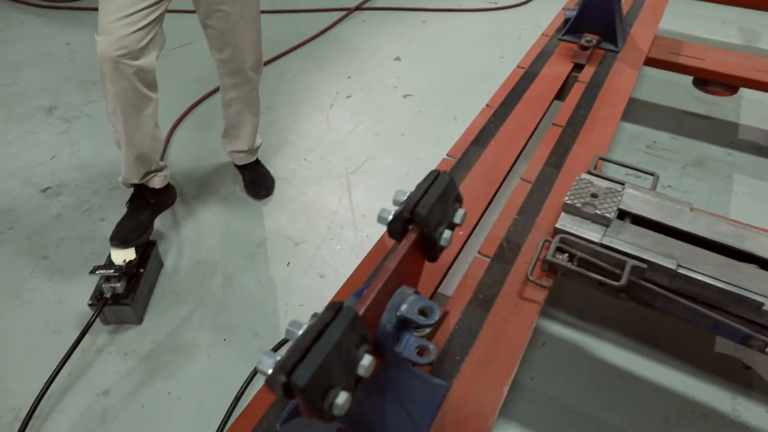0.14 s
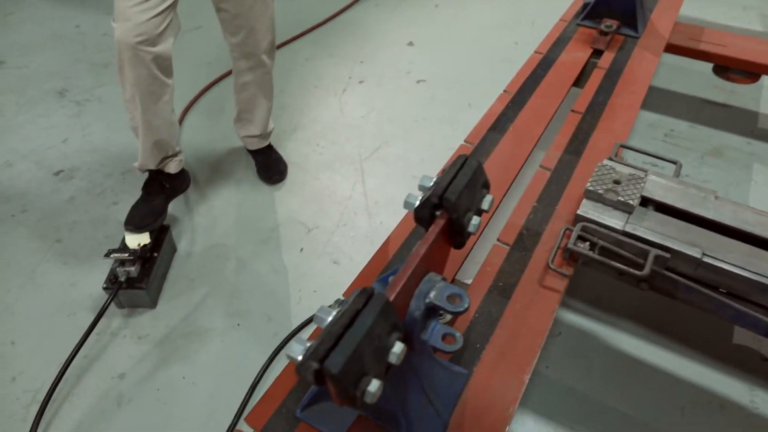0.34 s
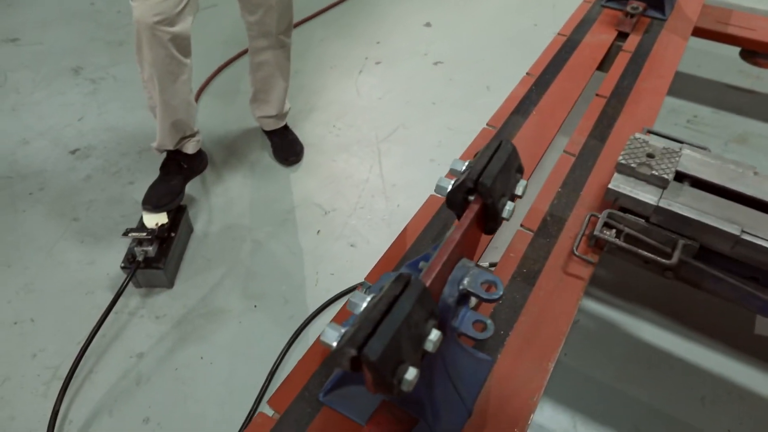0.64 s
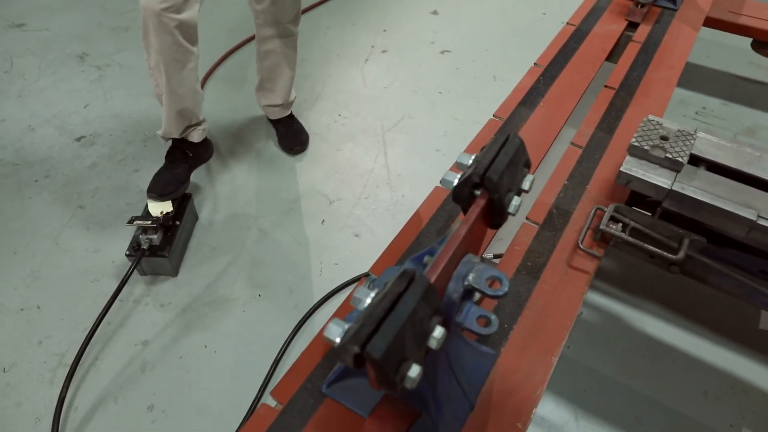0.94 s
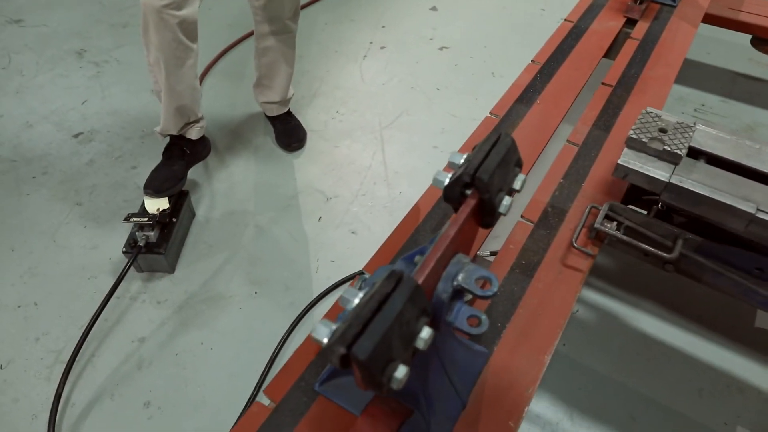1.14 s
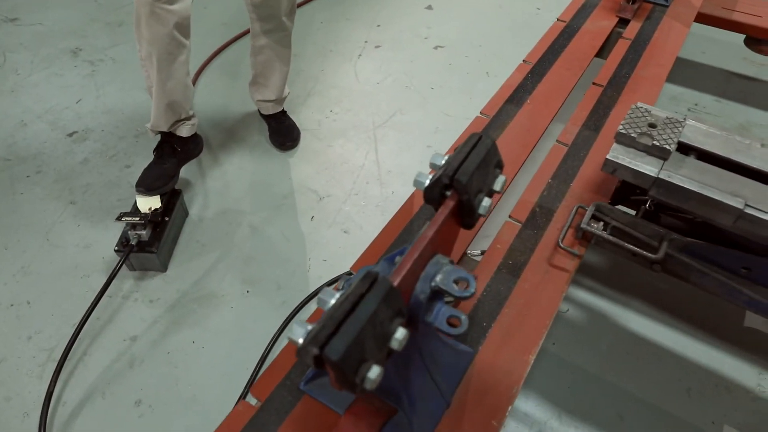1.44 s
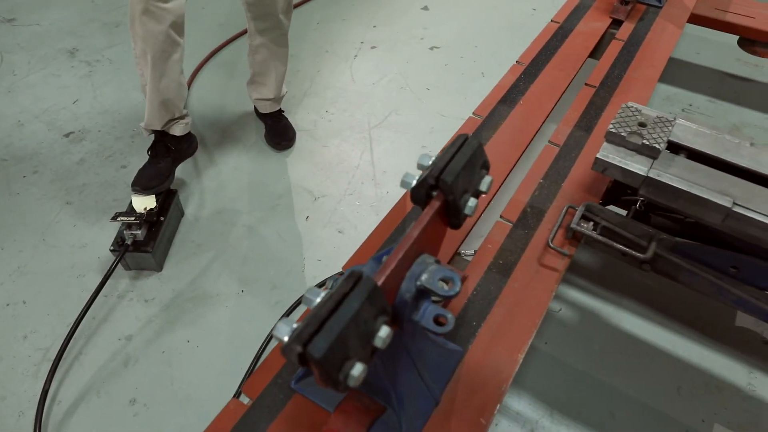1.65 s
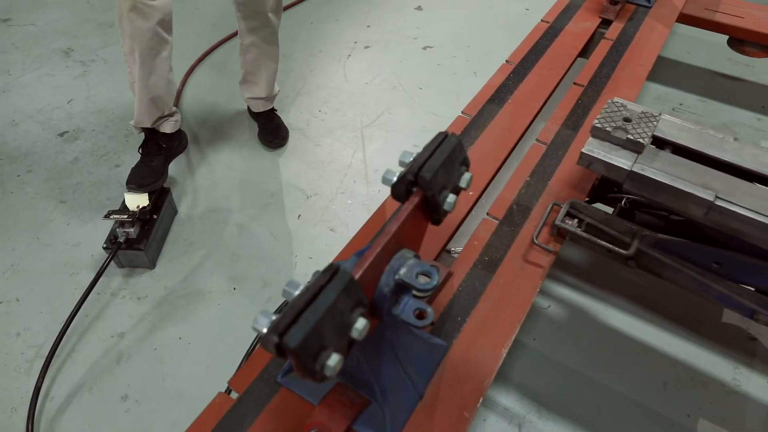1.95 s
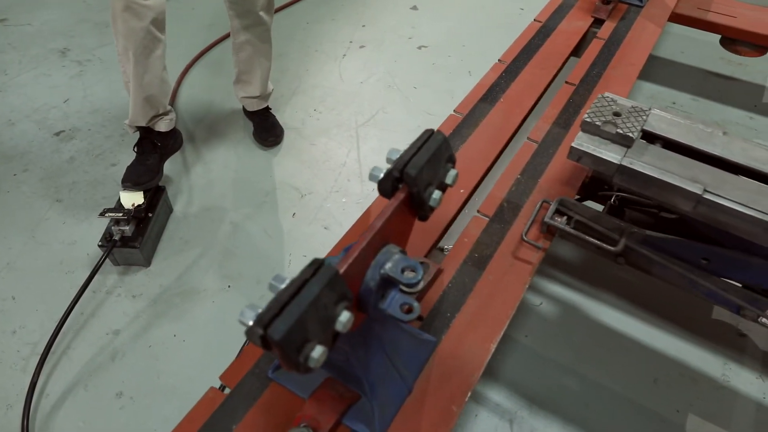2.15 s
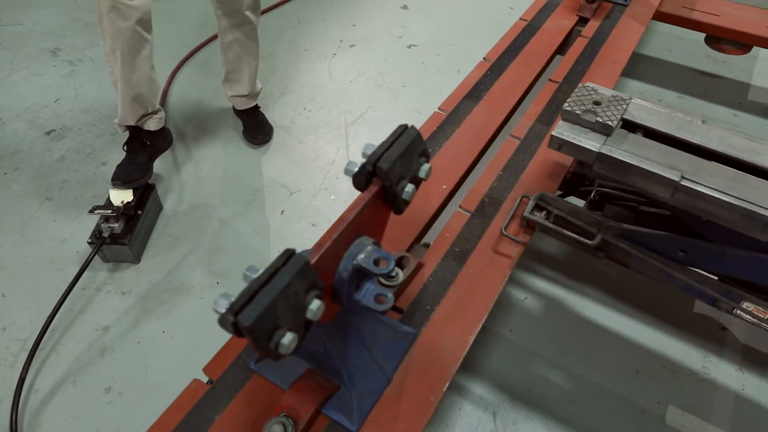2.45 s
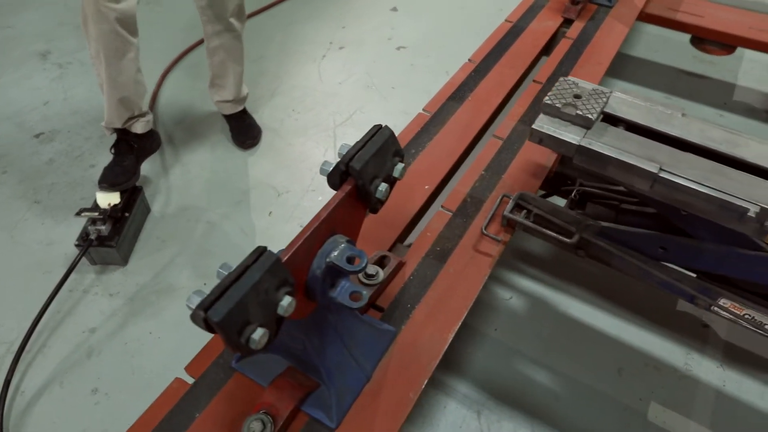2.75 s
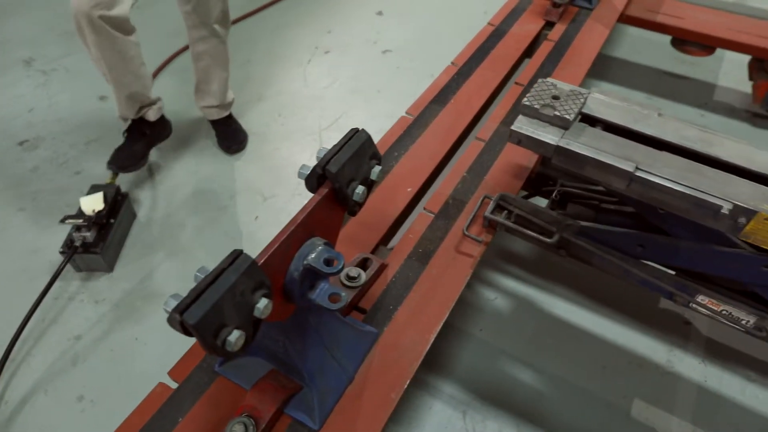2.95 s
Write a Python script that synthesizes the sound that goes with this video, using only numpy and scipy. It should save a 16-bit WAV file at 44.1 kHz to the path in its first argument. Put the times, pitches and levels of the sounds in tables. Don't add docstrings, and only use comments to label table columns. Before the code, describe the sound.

After a sharp pedal click, an air-powered pump chatters fast and hisses loudly, drops to separate heavy puffs, then hammers again and stops; close microphones, echoing hall, loudest blows slightly clipped.

```python
import sys
import numpy as np
from scipy import signal
from scipy.fft import rfft, irfft
from scipy.io import wavfile
from scipy.ndimage import uniform_filter1d

SR = 44100
rng = np.random.default_rng(int(sys.argv[2]) if len(sys.argv) > 2 else 0)


def rack_gain(trim_db):
    fader = np.asarray(trim_db, float)
    return 10 ** (fader / 20)


def persist_wave(psi):
    counts = np.round(np.clip(psi, -1, 1) * 32767).astype(np.int16)
    wavfile.write(sys.argv[1], SR, np.atleast_2d(counts).T)


N = 136710
T = np.arange(N) / SR


def evened(x):
    return x / np.sqrt(np.mean(x ** 2) + 1e-20)


def read(points, hz):
    f, value = np.transpose(points)
    return np.interp(np.log(hz + 1), np.log(f + 1), value)


def curve(points):
    s, db = np.transpose(points)
    return rack_gain(np.interp(T, s, db))


def struck(rows, shape):
    train = np.zeros(N)
    for s, db in rows:
        train[round(s * SR)] = rack_gain(db)
    return signal.oaconvolve(train, shape)[:N]


def resonate(x, peaks):
    out = 0
    for hz, width, db in peaks:
        r = np.exp(-np.pi * width / SR)
        top = [(1 - r * r) / 2, 0, (r * r - 1) / 2]
        bottom = [1, -2 * r * np.cos(2 * np.pi * hz / SR), r * r]
        out = out + rack_gain(db) * signal.lfilter(top, bottom, x)
    return out


def rung(modes, rise_s):
    t = T[:20000]
    tones = sum(rack_gain(db - 60 * t / t60) * np.sin(2 * np.pi * hz * t) for hz, db, t60 in modes)
    return tones * np.minimum(t / rise_s, 1)


def thump(dip_s, sag, fade_s):
    t = T[:4000]
    swing = -np.sin(np.pi * (t / dip_s) ** sag)
    return swing * np.exp(-(t / fade_s) ** 2 / 2) * np.minimum(t / dip_s, 1)


# (frequency [Hz], likeness [0 to 1])
LIKENESS = [(60, 0.93), (300, 0.8), (1400, 0.99), (3100, 0.96), (7000, 0.9), (15000, 0.99)]
# (frequency [Hz], left minus right [dB])
LEFT_LEAN = [(60, -1), (180, 3), (550, -0.5), (1650, 0), (4970, -1.5), (15000, 2.5)]


def air(spectrum, patchy_db, flicker_db):
    frames, hz = N // 128 + 6, np.fft.rfftfreq(512, 1 / SR)
    a, b, c, d, patches = rng.standard_normal((frames, 257, 5)).T
    patches = uniform_filter1d(patches, size=5, axis=0)
    patches = evened(uniform_filter1d(patches, size=12, axis=1))
    same = np.clip(read(LIKENESS, hz), 0, 1)[:, None]
    lean = read(LEFT_LEAN, hz)[:, None] / 2
    mid = (a + 1j * b) * np.sqrt(1 + same)
    side = (c + 1j * d) * np.sqrt(1 - same)
    z = np.array([(mid + side) * rack_gain(lean), (mid - side) / rack_gain(lean)])
    flicker = flicker_db * rng.standard_normal(frames)
    z = z * rack_gain(read(spectrum, hz)[:, None] + patchy_db * patches + flicker)
    return evened(signal.istft(z, nperseg=512, noverlap=384)[1][:, :N])


# (time [s], level [dB])
FIRST_RUN = [(0.2309, -3), (0.2748, -10), (0.3204, -18), (0.3655, -17), (0.41, -7), (0.4551, -13),
             (0.5008, -10), (0.5437, -5), (0.5866, -4), (0.6305, -4), (0.6754, -7), (0.7183, -5),
             (0.7607, -3), (0.8041, -3), (0.848, -4), (0.8914, -5), (0.9343, -6), (0.9772, -3),
             (1.0206, -7), (1.0635, -5), (1.1064, -4), (1.1493, -4), (1.1922, -5), (1.2351, -3)]
# (time [s], level [dB])
SECOND_RUN = [(2.2093, -4), (2.2537, -10), (2.2961, -6), (2.3375, -3), (2.3794, -5), (2.4218, -4),
              (2.4642, -5), (2.5066, -5), (2.5485, -5), (2.5904, -6), (2.6328, -6), (2.6747, -7),
              (2.7171, -6), (2.759, -5)]
# (frequency [Hz], width [Hz], level [dB])
CYLINDER = [(1700, 300, -9), (2200, 300, -7), (5700, 400, -9), (6900, 300, -9), (8100, 300, -8),
            (8850, 400, -9), (13300, 700, -5), (15000, 800, -8)]


def blows():
    rows, t = list(FIRST_RUN) + list(SECOND_RUN), T[:3000]
    rattle_s = .001
    hit = t / rattle_s * np.exp(-t / rattle_s) + 1.2 * np.exp(-t / .004)
    grit = rng.standard_normal(N) + 0.57 * rng.standard_normal((2, N))
    ring = resonate(struck(rows, hit) * grit, CYLINDER)
    even = [(s, 0.17 * db) for s, db in rows]
    swell = np.minimum(t / .004, 1) ** 2
    chuff = struck(even, swell * np.exp(-t / .012)) * air(JET, patchy_db=2.0, flicker_db=-3.5)
    return rack_gain(4) * ring + rack_gain(-11) * chuff + body(rows) + heads(rows)


# (delay [s], level [dB])
BOUNCES = [
    (.0035, -16),
    (.0115, -10),
]


def head(modes, tune):
    t, out = T[:1200], 0
    lag_s = .0005
    for hz, db, delay, top in modes:
        u = np.maximum(t - delay - lag_s, 0) / top
        out = out + rack_gain(db) * u * np.exp(1 - u) * np.sin(2 * np.pi * hz * tune * t)
    echoes = sum(rack_gain(db) * np.roll(out, round(s * SR)) for s, db in BOUNCES)
    return rack_gain(1) * (out + echoes)


# (frequency [Hz], level [dB], delay [s], time to peak [s])
HEAD = [(4980, 0, 0, .0007), (5250, -9, .0002, .0008), (4500, -12, 0, .0006), (8800, -7, .0008, .0008),
        (9700, -12, .0004, .0006), (2200, -19, .0015, .001)]
# (frequency [Hz], level [dB], delay [s], time to peak [s])
CHIRP = [(5350, 0, .002, .001), (5750, -1, .004, .0012), (6700, -6, 0, .0006)]


def heads(rows):
    out = np.zeros(N)
    for (s, db), chance in zip(rows, rng.standard_normal((len(rows), 1))):
        tune = 1 + .015 * chance
        chirp_db = -9 if s >= SECOND_RUN[0][0] else -18
        ring = head(HEAD, tune) + rack_gain(chirp_db) * head(CHIRP, tune)
        out[round(s * SR):][:len(ring)] += rack_gain(db) * ring
    return out


# (frequency [Hz], level [dB], time to fade 60 dB [s])
BODY = [(150, -16, .085), (300, -21, .03), (47, -24, .25), (420, -23, .03), (105, -26, .1)]
# (frequency [Hz], level [dB], time to fade 60 dB [s])
RETURN = [(258, -25, .2), (330, -30, .08)]
# (time [s], level [dB])
SEATING = [(.23, 3), (.27, -5), (.6, -6), (.75, -4), (1.0, -2.5), (1.3, -.5), (2.2, 0), (2.8, 0)]


def body(rows):
    s = np.transpose(rows)[0]
    landing = struck(zip(s + .0012, 0 * s), rung(BODY, rise_s=0.00069))
    returning = struck(zip(s + .025, 0 * s), rung(RETURN, rise_s=0.00033))
    return curve(SEATING) * (landing + returning)


# (time [s], level [dB])
FLOW = [(.17, -53), (.2295, -23), (.2315, -13.5), (.4, -13), (.8, -13), (1.24, -13.5), (1.27, -17),
        (1.4, -29.5), (1.85, -56.5), (1.9, -26), (2.15, -23), (2.22, -14.5), (2.35, -12), (2.77, -12.5),
        (2.79, -15.5), (2.9, -33)]
# (frequency [Hz], level [dB])
JET = [(210, 0), (350, -1.5), (726, -11.5), (1110, -5), (2580, -4), (2980, -6), (4500, -3.5), (7840, -7),
       (15500, -3)]
# (frequency [Hz], width [Hz], level [dB])
MUFFLER = [(1102, 52, 10), (1905, 320, -14.5), (4240, 450, 1), (4300, 7300, -6), (11400, 2100, -1)]
# (frequency [Hz], width [Hz], level [dB])
WHISTLE = [(2160, 500, 0), (2550, 200, -6), (5600, 900, -5)]
# (time [s], level [dB])
WHISTLE_FLOW = [(.2, -12), (.6, -5), (.8, -3), (1.3, -4), (2.25, -8), (2.35, -2), (2.8, -2)]


def hiss():
    jet = air(JET, patchy_db=1.5, flicker_db=1.48)
    whistle = curve(WHISTLE_FLOW) * resonate(jet, WHISTLE)
    return curve(FLOW) * jet_dips() * evened(jet + 0.41 * resonate(jet, MUFFLER) + whistle)


def jet_dips():
    lead_s, dip_s, share = .006, .004, .45
    rows = [(s - lead_s, 0) for s, db in list(FIRST_RUN[1:]) + list(SECOND_RUN)]
    u = T[:1200] / dip_s
    return 1 - share * struck(rows, u * u * np.exp(2 - 2 * u))


# (time [s], puff [dB], thump [dB], valve knock [dB], hum [dB])
LOADED = [
    (1.383, -22, -15.5, -16, -18.5),
    (1.498, -20.5, -15.5, -17, -14),
    (1.638, -18, -14.5, -15, -11),
    (1.863, -16.5, -10, -17, -16.5),
    (1.925, -16, -11.5, -17.5, -17),
    (1.986, -16.5, -12.5, -20, -26),
    (2.048, -16, -11, -17.5, -24),
    (2.109, -18.5, -12, -21, -19),
    (2.165, -18, -12, -23, -17),
]
# (frequency [Hz], level [dB])
PUFF = [(180, 2.5), (300, 3.5), (700, -18.5), (1450, -4), (4100, -8.5), (6000, -7.5), (8000, -13),
        (10800, -8), (15500, -11)]
# (frequency [Hz], width [Hz], level [dB])
PIPE = [(1955, 30, 2.5), (1064, 100, -3), (556, 58, -5.5)]
# (frequency [Hz], level [dB], time to fade 60 dB [s])
HUM = [(130, -8, .45), (256, -15, .35), (66, -13, .9)]
# (time [s], level [dB])
SURGES = [
    (2.2055, -12),
    (2.2125, -15),
]


def loaded():
    s, puff_db, thump_db, knock_db, hum_db = np.transpose(LOADED)
    t = T[:4000]
    gate = np.minimum(t / .0025, 1) * np.exp(-np.maximum(t - .019, 0) / .005)
    puff = struck(zip(s, puff_db), gate) * air(PUFF, patchy_db=1.5, flicker_db=0.0)
    bent = t + 0.00082 * (1 - np.exp(-t / 0.00021))
    knock = np.sin(2 * np.pi * 540 * bent) * np.exp(-t / .005)
    scrape = rng.standard_normal(len(t)) * np.exp(-t / .003)
    knock = knock + resonate(scrape, [(2000, 400, 3), (1200, 600, 0)])
    push = thump(dip_s=.003, sag=.65, fade_s=.011)
    thumps = struck(zip(s - .003, thump_db), push) + struck(SURGES, push)
    knocks = struck(zip(s + .0145, knock_db + 2), knock)
    hums = struck(zip(s + 0.02034, hum_db), rung(HUM, rise_s=0.016))
    return puff + resonate(puff, PIPE) + thumps + knocks + hums


# (time [s], level [dB])
TICKS = [(.102, -27), (.104, -30), (.106, -27), (.1085, -13), (.111, 0), (.1135, -8), (.1165, -20),
         (.134, -25), (.1465, -22), (.148, -19), (.152, -25)]
# (frequency [Hz], width [Hz], level [dB])
PEDAL = [(400, 300, -20), (1500, 500, -12), (2110, 350, -7), (2560, 300, -6), (3450, 260, -3),
         (3970, 130, 7), (4460, 260, 4), (4800, 200, -6), (5300, 200, -6), (5860, 250, -11),
         (7200, 900, -16)]


def pedal():
    t = T[:5000]
    tick = np.exp(-t / .0005) + .15 * np.exp(-t / .005)
    crack = struck(TICKS, tick) * rng.standard_normal(N)
    dull = signal.lfilter(*signal.butter(2, 9000, fs=SR), crack)
    thud = struck([(.109, -17.5)], -thump(dip_s=.007, sag=.75, fade_s=0.022))
    return 2.12 * resonate(dull, PEDAL) + thud


# (time [s], level [dB], frequency [Hz])
SHUDDERS = [
    (.322, -16, 126),
    (.368, -14.5, 135),
    (.411, -21, 140),
    (.456, -16, 140),
    (.500, -19, 128),
    (.540, -18, 120),
    (.591, -19, 130),
    (.77, -22, 120),
]


def shudders():
    out = struck([(.2405, -15)], thump(dip_s=0.0096, sag=1.0, fade_s=.014))
    for s, db, hz in SHUDDERS:
        bump = np.exp(-((T - s) / 0.008) ** 2 / 2)
        out = out + rack_gain(db) * bump * np.cos(2 * np.pi * hz * (T - s) + np.pi)
    return out


# (frequency [Hz], width [Hz], level [dB])
TANK = [(30, 10, -4.5), (46.4, 17, -32), (66, 3.4, -2.5), (108, 33, -1.5), (126, 68, -5), (162, 180, -8),
        (256, 13.4, -4)]
# (time [s], level [dB])
BOOM = [(0, -50), (.2, -45), (.24, -26), (.45, -24), (.65, -31), (.9, -33), (1.22, -31), (1.3, -22),
        (1.5, -23), (1.85, -25), (2.0, -29), (2.24, -25), (2.32, -33), (2.77, -32), (2.84, -24),
        (2.95, -25), (3.1, -29)]


def boom():
    shake = rng.standard_normal(N) + 0.39 * rng.standard_normal((2, N))
    return rack_gain([[-9], [-11]]) * curve(BOOM) * evened(resonate(resonate(shake, TANK), TANK))


# (time [s], level [dB])
SETTLING = [
    (0, -48),
    (2.78, -69),
    (2.86, -31),
    (2.98, -41.5),
    (3.1, -46),
]


def settling():
    return curve(SETTLING) * evened(resonate(rng.standard_normal(N), [(45, 24, 0), (97, 40, 0)]))


# (frequency [Hz], time to fade 60 dB [s])
HALL = [(80, 0.68), (500, 0.69), (2000, 0.87), (6000, 0.76), (11000, 0.51), (15000, 0.71)]


def hall(x):
    taps = np.zeros((2, SR))
    at = np.arange(300, SR - 20, 20) + rng.integers(0, 20, (2, (SR - 301) // 20))
    np.put_along_axis(taps, at, rng.choice([-1., 1.], at.shape), 1)
    taps = taps + 0.68 * taps.sum(0)
    hz, t, z = signal.stft(taps, SR, nperseg=256)
    tail = signal.istft(z * rack_gain(-60 * t / read(HALL, hz)[:, None]), SR, nperseg=256)[1]
    return signal.fftconvolve(x.mean(0)[None], tail / np.linalg.norm(tail[0]), axes=1)[:, :N]


# (frequency [Hz], level [dB])
FLOOR = [(15, -9), (25, 3), (95, -1.5), (180, -12.5), (260, -18), (800, -49), (3000, -47), (15000, -54)]


def quiet_hall():
    return rack_gain(-39.5) * air(FLOOR, patchy_db=1.5, flicker_db=.6)


def scene():
    hammer, airy, foot = blows(), hiss() + loaded(), pedal()
    room = hall(airy + rack_gain(-4) * hammer + rack_gain(-4) * foot)
    room = signal.lfilter(*signal.butter(2, 170, "high", fs=SR), room)
    near = hammer + airy + foot + shudders()
    return near + boom() + settling() + rack_gain(-3) * room + quiet_hall()


def top_cut(x):
    return signal.sosfilt(signal.butter(12, 16550, fs=SR, output="sos"), x)


# (frequency [Hz], side level [dB])
NARROW = [(30, 8), (200, 0.5), (6500, 2), (9000, -1.5), (12000, -8.5), (15000, -8.5)]


def record(dry):
    mid, side = (dry[0] + dry[1]) / 2, (dry[0] - dry[1]) / 2
    side = irfft(rfft(side) * rack_gain(read(NARROW, np.fft.rfftfreq(N, 1 / SR))), N)
    mid = signal.lfilter(*signal.butter(1, 12, "high", fs=SR), mid)
    edge = signal.firwin(801, 15850, window=("kaiser", 8), fs=SR)
    limited = signal.oaconvolve(np.array([mid + side, mid - side]), edge[None], "same")
    return top_cut(np.clip(limited, -1, 1))


dry = scene()
out = record(dry)
persist_wave(out)
```